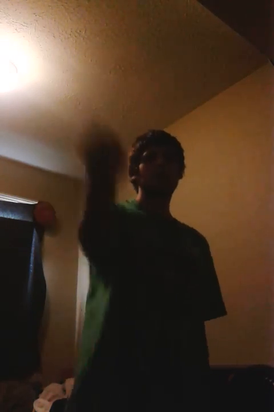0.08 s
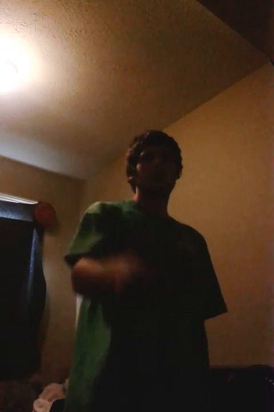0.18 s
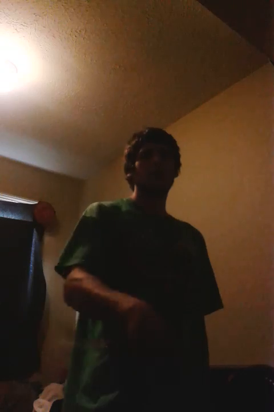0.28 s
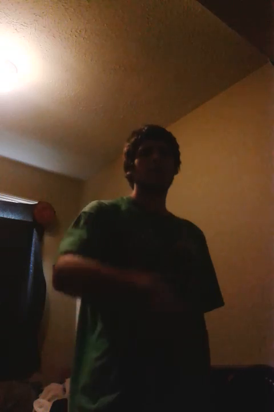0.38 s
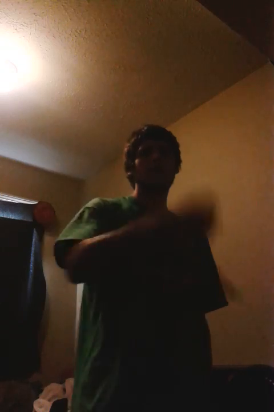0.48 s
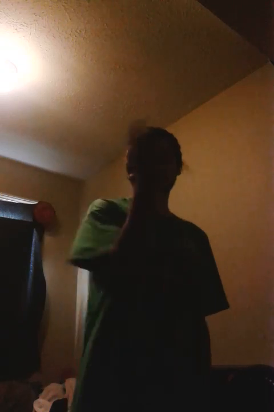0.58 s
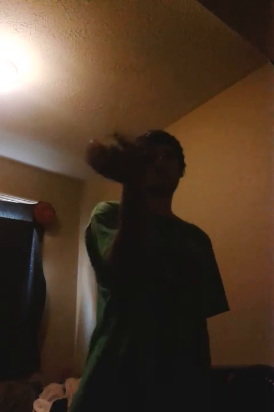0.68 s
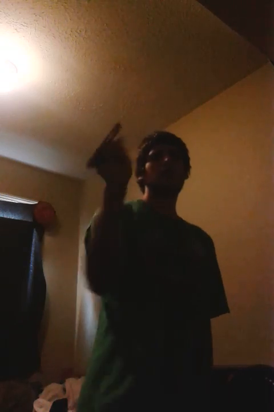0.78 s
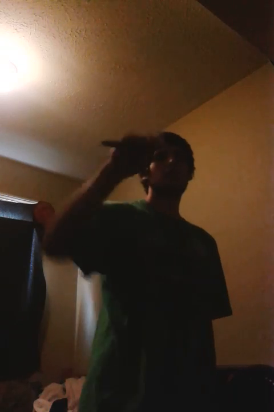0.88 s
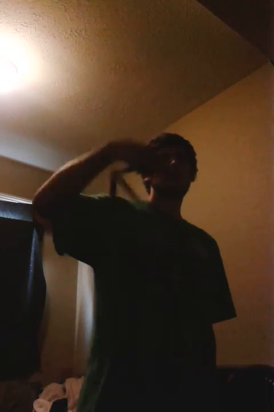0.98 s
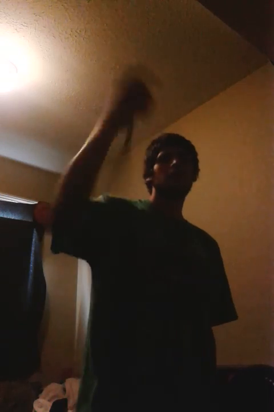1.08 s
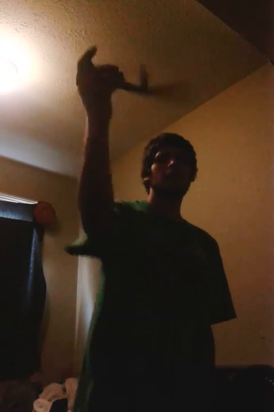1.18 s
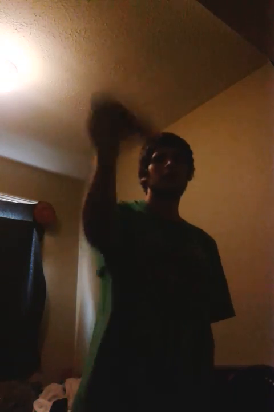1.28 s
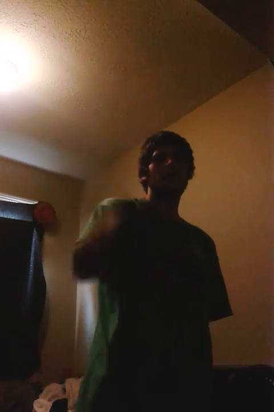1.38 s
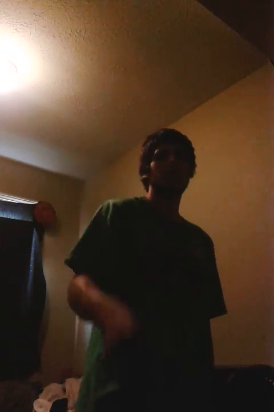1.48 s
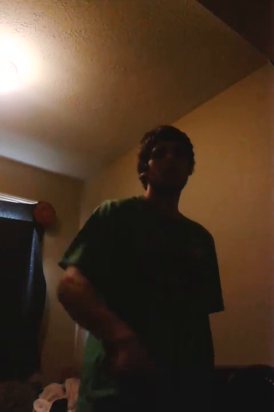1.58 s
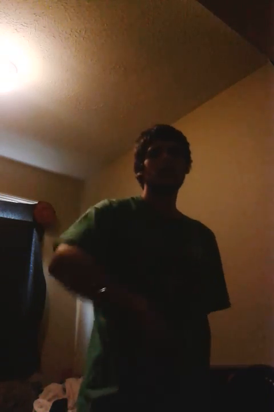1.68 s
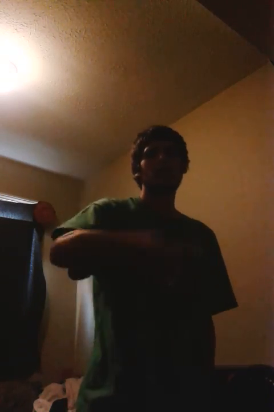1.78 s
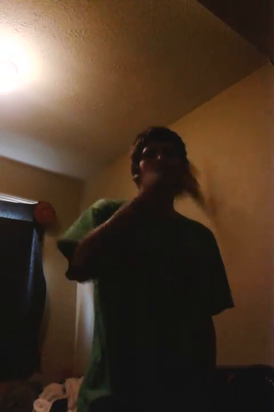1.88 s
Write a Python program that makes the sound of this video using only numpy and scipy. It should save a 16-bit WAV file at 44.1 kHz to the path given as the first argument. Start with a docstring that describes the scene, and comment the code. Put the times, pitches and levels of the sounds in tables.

```python
"""Folding knife flipped in a small room

Steel contacts, single and in loose rattles, are short damped modes plus a noise crack.
The handles add knocks: an unsteady ring stopped by the fingers, and a dull noise thud.
Discrete wall echoes and a short noise tail answer; coloured noise makes the hush, rumble,
drone and sleeve."""
import sys
import numpy as np
from scipy import signal
from scipy.fft import rfft, irfft, next_fast_len
from scipy.io import wavfile
from scipy.ndimage import uniform_filter1d, minimum_filter1d, map_coordinates

SR = 44100
rng = np.random.default_rng(int(sys.argv[2]) if len(sys.argv) > 2 else 0)


def transcribe(u):
    """Save the signal u as a 16-bit wav file named by the first command-line argument.

    u: samples, shape (n,) or (channels, n), limited to [-1, 1]; the rate is SR.
    q: integer samples, one column per channel.
    """
    v = np.clip(np.atleast_2d(u).T, -1, 1)
    q = np.round(v * 32767).astype(np.int16)
    wavfile.write(sys.argv[1], SR, q)


def voltage_ratio(level):
    """Linear amplitude factor for a level in decibels (scalar or array-like)."""
    return 10 ** (np.asarray(level, float) / 20)


N = 85995

# Noise spectra, relative: hz, density_db
HUSH_SPECTRUM = [(15, -28), (25, -17), (121, -2.5), (488, -5.5), (879, -11), (1210, -12), (1860, -15),
                 (2850, -20), (3440, -20), (13800, -20.5), (15000, -53)]
RUMBLE_SPECTRUM = [(25, -28), (55, 8.5), (85, 10), (125, 1), (180, 2), (300, -16.5)]
DRONE_SPECTRUM = [(380, -40), (450, -7), (490, -9), (580, -69)]
CLOTH_SPECTRUM = [(250, -4.5), (500, 0.5), (1000, -1.5), (2500, -7), (5000, -10.5)]
CRACK_SPECTRUM = [(1180, -38), (2000, -20.5), (2350, -27.5), (4890, -6.5), (6030, -11.5), (8040, -0.5),
                  (9360, -4), (14100, -9), (15000, -7.5)]
THUD_SPECTRUM = [(300, -34), (700, -1.5), (1500, -2.5), (3000, -3), (5000, -9.5)]
# Background levels before ducking: time_s, level_db
HUSH_LEVEL = [(0.0, -54), (0.21, -54.5), (0.434, -58), (0.64, -59), (0.754, -55), (1.656, -58.5),
              (1.95, -59.5)]
RUMBLE_LEVEL = [(0.0, -82), (0.064, -71), (0.216, -103), (0.254, -89), (0.314, -64), (0.418, -61),
                (0.466, -78.5), (0.498, -60), (0.536, -57.5), (0.57, -94), (0.706, -53), (0.786, -78),
                (0.824, -69), (1.08, -80), (1.102, -73), (1.162, -58.5), (1.204, -80), (1.276, -82),
                (1.336, -92), (1.498, -55.5), (1.564, -74), (1.618, -57), (1.802, -74), (1.95, -80)]
DRONE_LEVEL = [(0, -61), (.17, -63.5), (.3, -76), (.7, -68), (1.3, -100), (1.75, -77), (1.84, -56.5),
               (1.89, -65.5), (1.92, -55), (1.95, -59)]
SLEEVE_LEVEL = [(1.76, -56.5), (1.82, -52.5), (1.87, -54.5), (1.92, -48.5), (1.95, -57)]
# Steel modes, nominal: pitch_hz, relative_db, t60_s
STEEL_MODES = [(3580, -4.5, 0.0091), (4700, -11, 0.0068), (5770, 4, 0.0041), (7300, -3, 0.0029),
               (8050, 10.5, 0.0049), (9300, 7.5, 0.0049), (10500, -1, 0.012), (11170, -1.5, 0.0063),
               (13900, 2.5, 0.009)]
# Lower handle modes, nominal: pitch_hz, relative_db, t60_s
HANDLE_MODES = [(290, 0.5, 0.09), (480, -4.5, 0.18), (870, -2.5, 0.15), (1450, 0, 0.095), (1850, 4, 0.076),
                (2250, 1, 0.099), (2550, -8, 0.12)]
# Early wall echoes, nominal delay: delay_s, level_db
WALLS = [(.0022, -9), (.0037, -10), (.0052, -12), (.0068, -13), (.0085, -15), (.012, -17), (.016, -18),
         (.021, -19)]
# Decay of the room's tail: hz, t60_s
ROOM_DECAY = [(300, 0.29), (2000, 0.24), (5500, 0.15), (10000, 0.14), (14600, 0.14)]
# Runs of small contacts: start_s, length_s, nominal_peak_db, brightest_hz, tail_lift_db, swell_db
RATTLES = [(0, 0.0062, -37, 9300, 3.5, 5.5), (0.137, 0.024, -33.5, 10500, 2, 0.5),
           (0.206, 0.0081, -36.5, 4700, 11, 2.5), (0.219, 0.0056, -16.5, 11100, -6, -0.5),
           (0.226, 0.016, -13, 8050, -3, -1), (0.587, 0.0074, -18.5, 10500, -6, 16),
           (0.601, 0.0052, -30, 9300, -3, 0), (.625, 0.0058, -27, 9300, 0, 1),
           (0.728, 0.012, -20.5, 8600, -4, 16), (.744, .024, -27, 8050, -9, 3),
           (0.7511, 0.0026, -12, 9000, -8, -6), (0.788, .004, -8.5, 8050, -8, 14),
           (1.002, 0.042, -45, 10500, -7, -1.5), (1.176, 0.0069, -31.5, 9300, -1, -2),
           (1.206, 0.016, -33.5, 9300, 1, -3.5), (1.2473, 0.0068, -29.5, 9300, -7.5, -5),
           (1.346, 0.0054, -6, 7300, -9, 6), (1.352, 0.0065, -20.5, 7300, -11, -3),
           (1.4032, 0.0046, -15.5, 7300, -3, -0.5), (1.541, 0.014, -35, 8050, 2.5, -0.5)]
# Single contacts: start_s, approx_peak_db, brightest_hz, lower_treble_lift_db, tail_lift_db (before limits)
CLICKS = [(0.0144, -25, 11100, 7, -1), (0.1134, -43, 3460, 19, 2), (0.1247, -35.5, 7300, 11, 1),
          (0.1375, -22.5, 10600, 1, -6), (0.1422, -14.5, 8200, -7.5, -3), (0.2193, -8, 8020, -23, 2),
          (0.231, -4, 8050, -20, -1), (0.2407, -7.5, 7900, -16, 6), (0.2681, -10, 8600, 4.5, 0),
          (0.3425, -31.5, 9000, 3, 0.5), (0.3883, -39.5, 3900, 12, -10), (0.432, -45, 8000, -9, 6),
          (0.445, -24, 12800, 0.5, 8.5), (0.5433, -29.5, 8650, 3, -4), (0.5513, -30, 11000, 4, -4),
          (0.558, -18.5, 12200, 0, -2), (0.5925, -23, 10500, -7, -2), (0.5989, -16, 9600, 4, 1.5),
          (0.621, -21, 13500, -1, -6), (0.7214, -22.5, 8100, 6, 5), (0.7414, -10.5, 8800, 4.5, 0.5),
          (0.7537, -7.5, 8900, 10.5, 1), (.7632, -23, 8700, -3, -5), (0.7783, -13, 9410, -14, -8),
          (0.7911, -5.5, 7840, 1, -2), (0.8006, -10, 8450, -15, 0.5), (0.9019, -17.5, 8400, 1.5, 0),
          (0.9485, -29.5, 8900, -4, 2.5), (1.0158, -32, 8050, 12, 1), (1.027, -31.5, 13100, 8.5, 7),
          (1.0346, -35, 10500, 10, -5), (1.0759, -18, 7100, 5, 2.5), (1.092, -13.5, 7900, -2.5, -4.5),
          (1.177, -34, 9570, 3, 4), (1.2083, -33, 12100, 2, -10), (1.2151, -24, 5100, 14, 1.5),
          (1.231, -34, 11250, 1, -2), (1.2489, -21.5, 8050, 6, -8), (1.262, -27, 12400, 0, -4),
          (1.3151, -1.5, 8000, 3.5, -7), (1.3405, -6.5, 8050, 0, -5), (1.3499, 0.5, 7300, 6.5, -3.5),
          (1.3633, -5, 11400, -3, -1), (1.3947, -7.5, 12200, -3, 0.5), (1.4055, -15, 8050, 3, -1),
          (1.5179, -26.5, 9160, -5, 3), (1.5225, -30, 9000, -7, -4), (1.5415, -32, 8360, -3, -5),
          (1.6267, -34.5, 7500, 0, 1.5), (1.719, -45.5, 8350, 8, -1), (1.747, -34, 8200, 4, 0),
          (1.7626, -16, 10160, -12, -5), (1.8098, -29, 11700, 3, 3), (1.884, -18.5, 9400, -0.5, 2)]
# Handles meeting in the hand: start_s, nominal_peak_db, strongest_hz, free_ring_s, thud_over_ring_db
KNOCKS = [(0.138, -55.5, 1450, 0.019, 10.5), (.152, -54, 1850, .01, 9.5), (.168, -53, 1850, .01, 11),
          (.2205, -36.5, 870, 0.0085, -16), (.225, -35.5, 1450, 0.005, 0), (.226, -40, 1850, 0.017, 1.5),
          (.234, -38.5, 2250, 0.0085, -8), (.236, -42.5, 870, 0.063, -20), (.25, -53, 2250, .04, -16),
          (.262, -44, 1850, 0.038, -15), (.45, -58, 870, 0.012, 5), (.545, -58.5, 1450, .01, 7),
          (.59, -52, 2250, 0.0074, 8), (0.599, -43, 1450, 0.01, 5.5), (.622, -52, 1450, .01, 10),
          (0.721, -44.5, 1450, .006, 10), (0.738, -43.5, 1850, .01, 9), (.752, -38.5, 2250, 0.0064, 3.5),
          (0.753, -38, 480, 0.0031, -1), (0.77, -46, 480, 0.0066, -20), (.778, -41.5, 1450, 0.0061, -23),
          (.762, -44, 2250, 0.013, -9), (.787, -38, 1850, 0.012, -9), (.795, -44, 480, 0.018, -24),
          (0.903, -58, 1850, 0.011, 7), (0.95, -50.5, 1850, .008, 3), (1.077, -50, 870, 0.011, 6.5),
          (1.092, -48.5, 870, .012, 6), (1.203, -51.5, 1450, 0.016, 8), (1.25, -51.5, 1450, 0.0084, 3),
          (1.313, -39.5, 870, .014, -0.5), (1.314, -38.5, 1450, 0.0087, 0.5), (1.323, -41, 480, 0.0057, -8),
          (1.338, -42, 870, 0.0037, 0), (1.348, -32, 1450, 0.023, -2), (1.35, -27.5, 1850, 0.034, -32),
          (1.3485, -35.5, 870, 0.041, -20), (1.35, -26.5, 2550, .028, -23), (1.362, -41.5, 290, 0.021, -17),
          (1.404, -39, 1850, 0.0041, -20), (1.41, -47, 480, 0.02, -23), (1.411, -39.5, 2550, .01, -20),
          (1.52, -53, 870, 0.012, 2), (1.545, -52, 2250, .012, 9.5), (1.885, -53.5, 2250, 0.011, 11)]

MODE_SPREAD_DB, STEEL_FOCUS_DB, STEEL_FOCUS_OCT = 3, 12, 0.12
CRACK_OVER_RING_DB, CRACK_T60_S, STEEL_ATTACK_S = 0.98, 0.0048, 0.00038
LOWER_TREBLE_HZ, CONTACT_NORM = 6000, 3
RATTLE_PER_S, RATTLE_SPREAD_DB = 1400, 3.5
TAIL_DB, TAIL_DELAY_S, TAIL_RISE_S, TAIL_SWING_DB = -1.5, 0.0014, 0.0097, 5
GRAIN_DB, GRAIN_PER_S = 3, 500
HANDLE_FOCUS_DB, HANDLE_FOCUS_OCT, HANDLE_ATTACK_S = 22, 0.1, 0.0022
GRIP_T60_S, DETUNE_RATIO, BUZZ_DB, BUZZ_HZ = 0.012, 0.025, 3.5, 150
THUD_T60_S, THUD_ROOM_DB, RING_ROOM_DB = 0.03, -4.5, -28
STEEL_CUT_HZ, HANDLE_CUT_HZ = 1700, 220
DUCK_HZ, DUCK_FROM_DB, DUCK_RATIO, DUCK_S = 1500, -28.5, 9.4, 0.0029
TOP_HZ, TOP_SLOPE_HZ, TOP_LOSS_DB = 14550, 300, -28
PEAK_CEILING, HISS_DB = 0.97, -42


def along(points, hz):
    """Interpolate (hz, value) points on a log frequency axis."""
    f, v = np.transpose(points)
    return np.interp(np.log(hz + 1), np.log(f + 1), v)


def noise(spectrum, size):
    """Gaussian noise shaped in frequency, scaled to rms 1."""
    m = next_fast_len(size + 2048)
    white = rfft(rng.standard_normal(m))
    x = irfft(white * voltage_ratio(along(spectrum, np.fft.rfftfreq(m, 1 / SR))), m)[:size]
    return x / np.sqrt(np.mean(x ** 2) + 1e-20)


def level(rows, before_db=None):
    """Gain per sample, interpolated in dB between timed rows."""
    s, db = np.transpose(rows)
    return voltage_ratio(np.interp(np.arange(N) / SR, s, db, left=before_db))


def hush():
    """Sum of coloured noises: room hush, varying low rumble, narrow drone and a late sleeve brush."""
    out = level(HUSH_LEVEL) * noise(HUSH_SPECTRUM, N)
    out += level(RUMBLE_LEVEL) * noise(RUMBLE_SPECTRUM, N)
    out += level(DRONE_LEVEL) * noise(DRONE_SPECTRUM, N)
    return out + level(SLEEVE_LEVEL, -120) * noise(CLOTH_SPECTRUM, N)


def ringing(modes, bright_hz, lift_db, octaves, t):
    """Damped sines, random phases and level offsets, lifted near bright_hz; peak 1."""
    hz, db, t60 = np.transpose(modes)[:, :, None]
    focus = np.exp(-0.5 * (np.log2(hz / bright_hz) / octaves) ** 2)
    db = db + lift_db * focus + MODE_SPREAD_DB * rng.standard_normal(hz.shape)
    sines = np.sin(2 * np.pi * (hz * t + rng.random(hz.shape)))
    ring = np.sum(voltage_ratio(db - 60 * t / t60) * sines, axis=0)
    return ring / np.abs(ring).max()


def contact(bright_hz, lower_db):
    """Steel touching steel: short modes and a decaying noise crack, at fixed energy."""
    t = np.arange(SR // 40) / SR
    ring = ringing(STEEL_MODES, bright_hz, STEEL_FOCUS_DB, STEEL_FOCUS_OCT, t)
    crack = voltage_ratio(CRACK_OVER_RING_DB - 60 * t / CRACK_T60_S) * noise(CRACK_SPECTRUM, len(t))
    tick = (ring + crack) * np.clip(t / STEEL_ATTACK_S, 0, 1) ** 2
    hz = np.fft.rfftfreq(len(t), 1 / SR)
    lift = voltage_ratio(lower_db / (1 + (hz / LOWER_TREBLE_HZ) ** 6))
    tick = irfft(rfft(tick) * lift, len(t))
    return CONTACT_NORM * tick / np.linalg.norm(tick)


def room(tail_lift_db=0):
    """Room impulse response: a few wall echoes and a noise tail with frequency-dependent decay."""
    hz, t, z = signal.stft(rng.standard_normal(SR // 2), SR, nperseg=128)
    decay = voltage_ratio(-60 * t / along(ROOM_DECAY, hz)[:, None])
    tail = signal.istft(z * decay, SR, nperseg=128)[1]
    t = np.arange(len(tail)) / SR
    # random level variation makes the tail grainy
    grain = voltage_ratio(GRAIN_DB * map_coordinates(rng.standard_normal(400), [t * GRAIN_PER_S]))
    tail = grain * tail * np.clip((t - TAIL_DELAY_S) / TAIL_RISE_S, 0, 1)
    tail = voltage_ratio(TAIL_DB + tail_lift_db) * tail / np.linalg.norm(tail)
    for delay_s, db in WALLS:
        jitter = np.exp(0.1 * rng.standard_normal())
        tail[round(delay_s * SR * jitter)] += voltage_ratio(db)
    return tail


def add(track, s, x):
    """Mix x into track at s seconds."""
    part = track[max(round(s * SR), 0):][:len(x)]
    part += x[:len(part)]


def rattles():
    """Loose parts chattering: quick uneven runs of small contacts, direct and through the room."""
    out = np.zeros(N)
    for s, length_s, db, hz, tail_db, swell_db in RATTLES:
        run = np.zeros(SR // 8)
        for k, (late, size, pitch) in enumerate(rng.standard_normal((80, 3))):
            x = contact(hz * np.exp(0.06 * pitch), 0)
            when_s = abs(k + 0.5 + 0.6 * late) / RATTLE_PER_S
            hit_db = db + RATTLE_SPREAD_DB * size - swell_db * (1 - when_s / length_s)
            # contacts past the end fade to zero
            inside = np.clip((length_s - when_s) * RATTLE_PER_S + 0.5, 0, 1)
            add(run, when_s, x * voltage_ratio(hit_db) * inside)
        add(out, s, run)
        add(out, s, signal.fftconvolve(run, room(tail_db)))
    return out


def clicks():
    """Single steel contacts, each direct and through its own room response."""
    out = np.zeros(N)
    for s, db, hz, lower_db, tail_db in CLICKS:
        x = voltage_ratio(db) * contact(hz, lower_db)
        add(out, s, x)
        tail_db = np.clip(tail_db, -TAIL_SWING_DB, TAIL_SWING_DB)
        add(out, s, signal.fftconvolve(x, room(tail_db)))
    return out


def knocks():
    """Handles meeting: unsteady modal ring until the grip damps it, plus a decaying dull thud."""
    out, t = np.zeros(N), np.arange(SR // 10) / SR
    for s, db, hz, free_s, thud_db in KNOCKS:
        buzz = voltage_ratio(BUZZ_DB * map_coordinates(rng.standard_normal(40), [t * BUZZ_HZ]))
        # each knock is slightly detuned at random
        warped_t = t * np.exp(DETUNE_RATIO * rng.standard_normal())
        ring = ringing(HANDLE_MODES, hz, HANDLE_FOCUS_DB, HANDLE_FOCUS_OCT, warped_t)
        grip_db = -60 * np.clip(t - free_s, 0, 1) / GRIP_T60_S
        ring = buzz * ring * voltage_ratio(db + grip_db) * np.clip(t / HANDLE_ATTACK_S, 0, 1)
        thud = voltage_ratio(db + thud_db - 60 * t / THUD_T60_S) * noise(THUD_SPECTRUM, len(t))
        add(out, s, ring + thud)
        to_room = voltage_ratio(RING_ROOM_DB) * ring + voltage_ratio(THUD_ROOM_DB) * thud
        add(out, s, signal.fftconvolve(to_room, room()))
    return out


def filtered(x, response):
    """Apply a zero-phase gain given as a function of hz."""
    m = next_fast_len(N + 4096)
    return irfft(rfft(x, m) * response(np.fft.rfftfreq(m, 1 / SR)), m)[..., :N]


def above(x, cut_hz):
    """Fourth-order high-pass: so small a thing radiates no bass."""
    return signal.sosfilt(signal.butter(4, cut_hz, "high", fs=SR, output="sos"), x)


def ducked(background, knife):
    """Lower the background's low part while the smoothed knife level is high."""
    keep = np.exp(-1 / (DUCK_S * SR))
    loud = np.sqrt(signal.lfilter([1 - keep], [1, -keep], knife ** 2))
    low = filtered(background, lambda hz: 1 / (1 + (hz / DUCK_HZ) ** 4))
    return background - low + low / (1 + (loud / voltage_ratio(DUCK_FROM_DB)) ** DUCK_RATIO)


def scene():
    """Knife over the ducked background, identical in both channels."""
    background = hush()
    steel = above(rattles() + clicks(), STEEL_CUT_HZ)
    knife = steel + above(knocks(), HANDLE_CUT_HZ)
    x = knife + ducked(background, knife)
    return np.array([x, x])


def roll_off(x):
    """The treble ends steeply here."""
    return signal.sosfilt(signal.butter(12, 15760, fs=SR, output="sos"), x)


def record(dry):
    """Cut the top, limit peaks with a smoothed gain, add level-following hiss in opposite polarity."""
    x = filtered(dry, lambda hz: voltage_ratio(TOP_LOSS_DB * np.clip((hz - TOP_HZ) / TOP_SLOPE_HZ, 0, 1)))
    gain = np.minimum(1, PEAK_CEILING / (np.abs(x) + 1e-9))
    x = x * uniform_filter1d(minimum_filter1d(gain, size=81), size=41)
    hiss = voltage_ratio(HISS_DB) * np.abs(x[0]) * rng.standard_normal(N)
    return roll_off(x + [hiss, -hiss])


dry = scene()
out = record(dry)
transcribe(out)
```